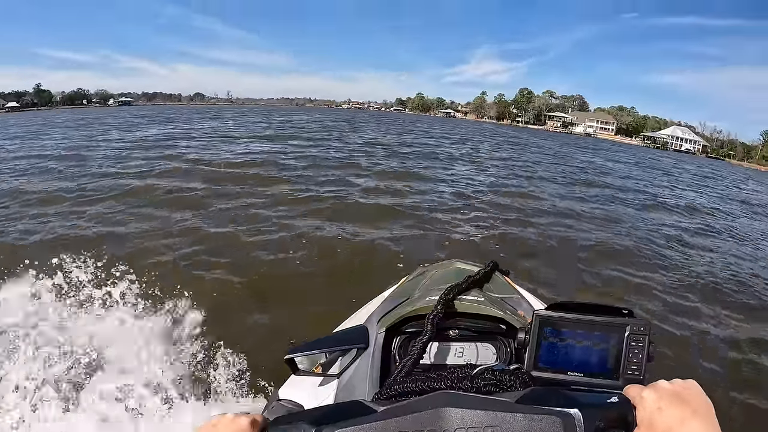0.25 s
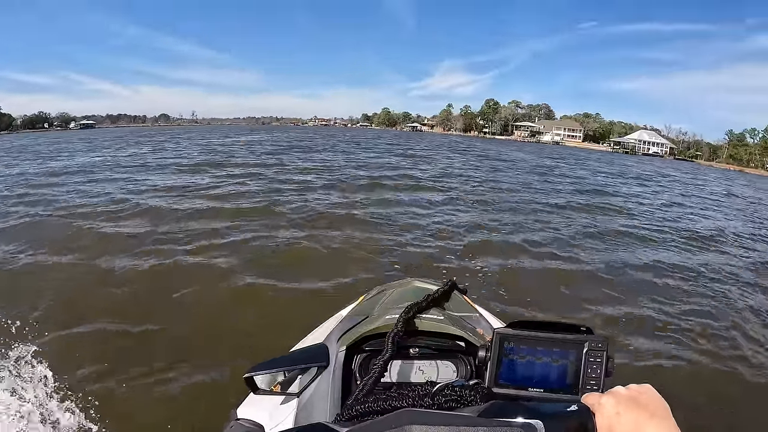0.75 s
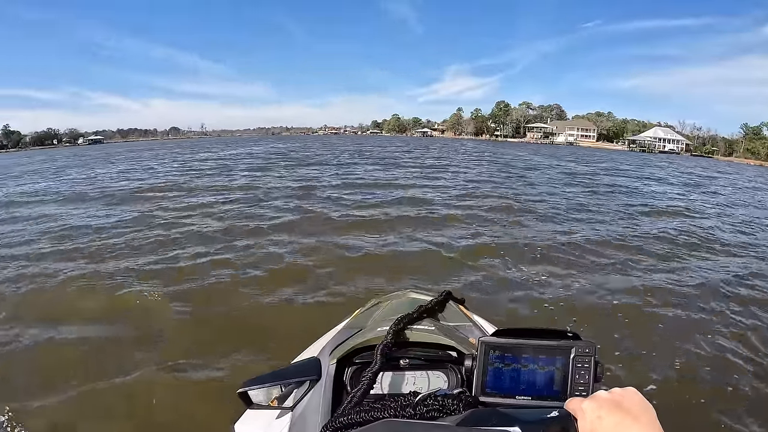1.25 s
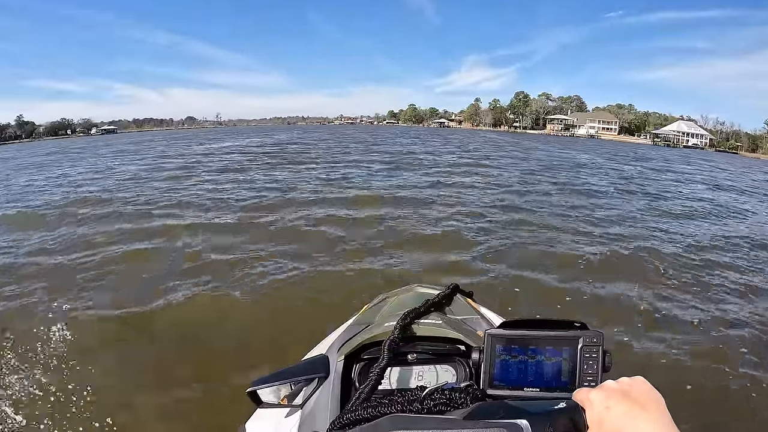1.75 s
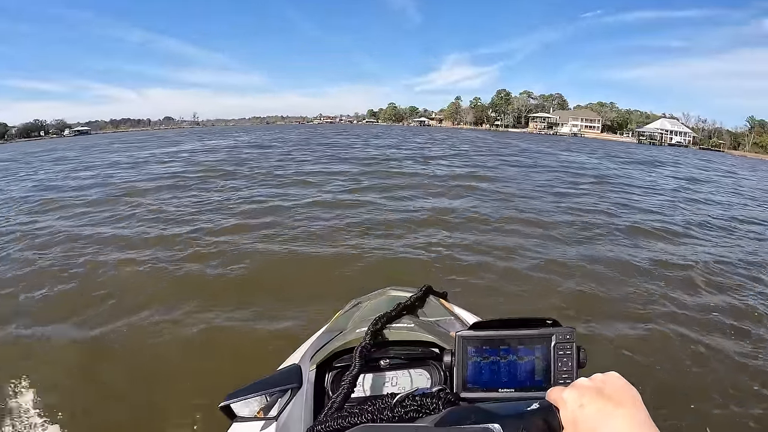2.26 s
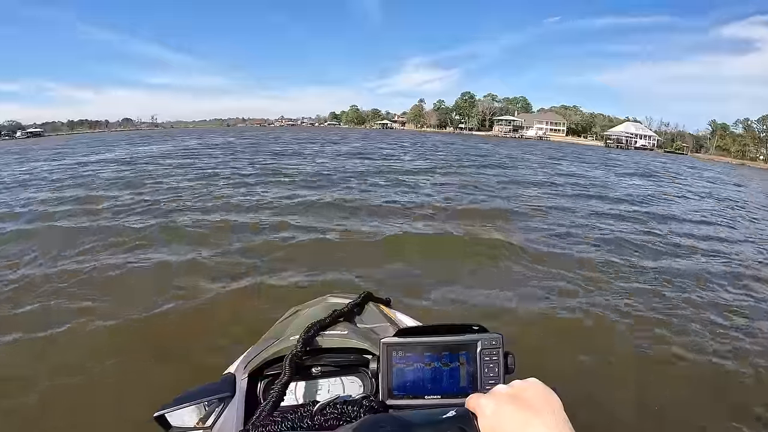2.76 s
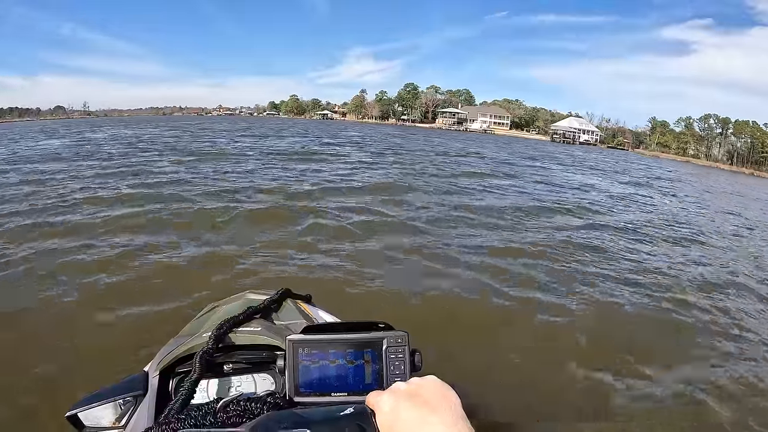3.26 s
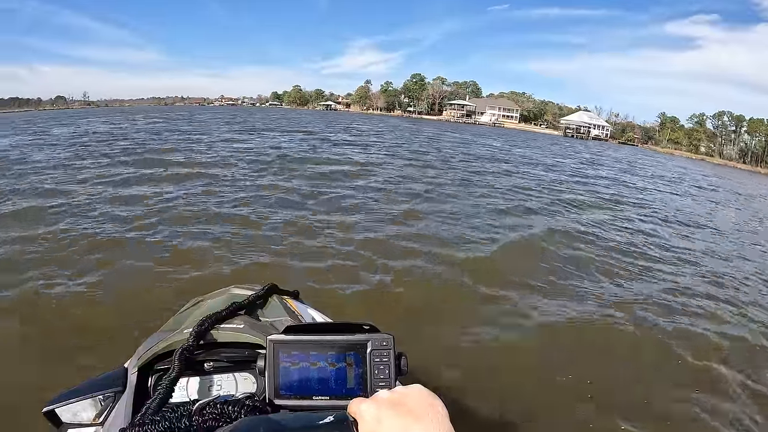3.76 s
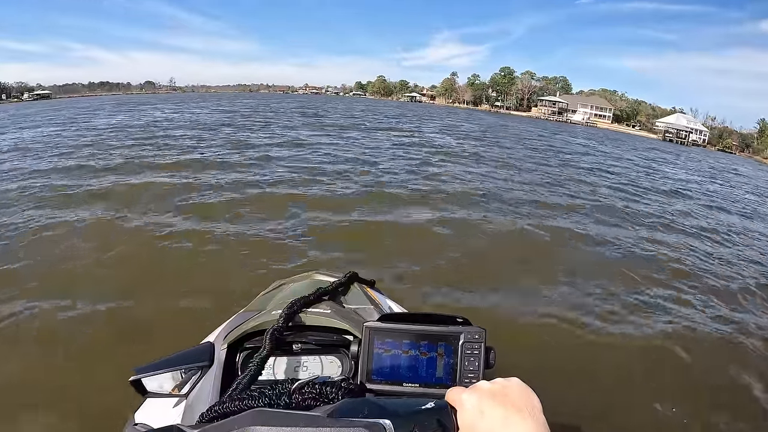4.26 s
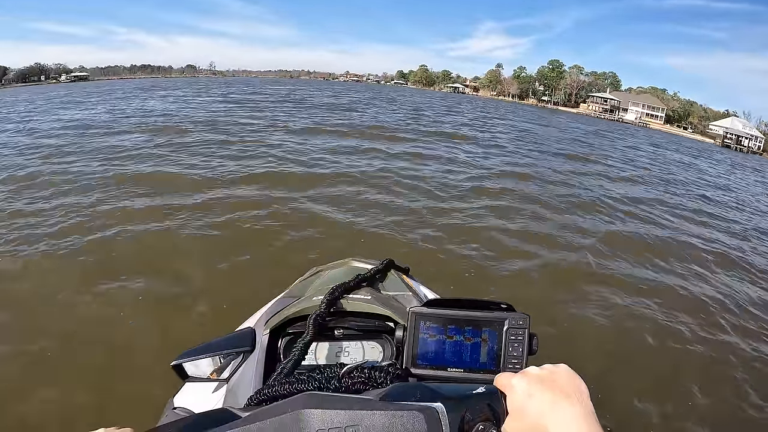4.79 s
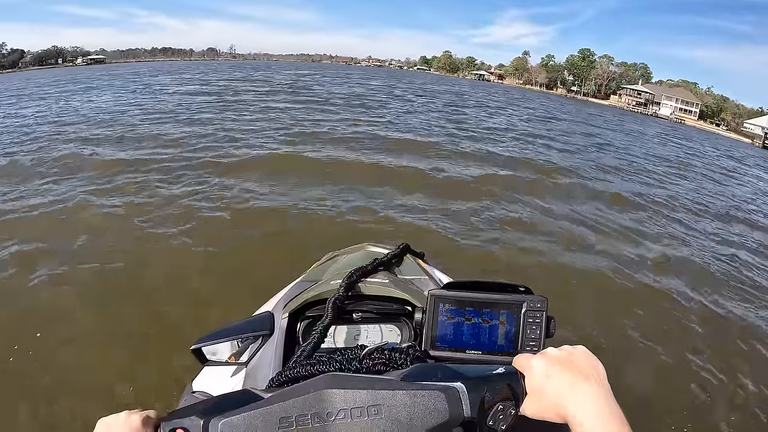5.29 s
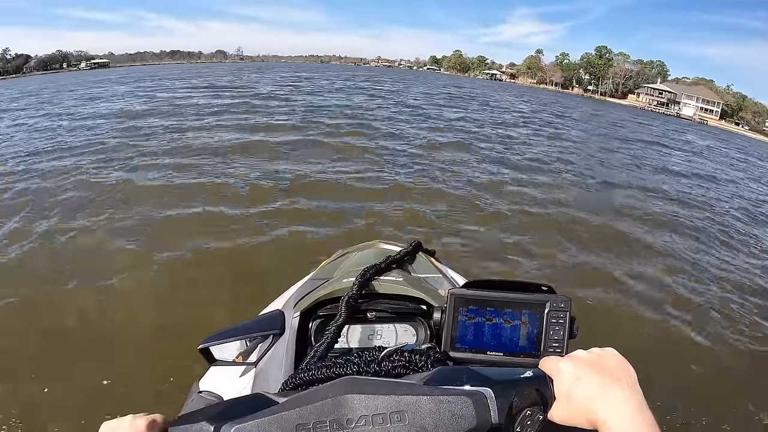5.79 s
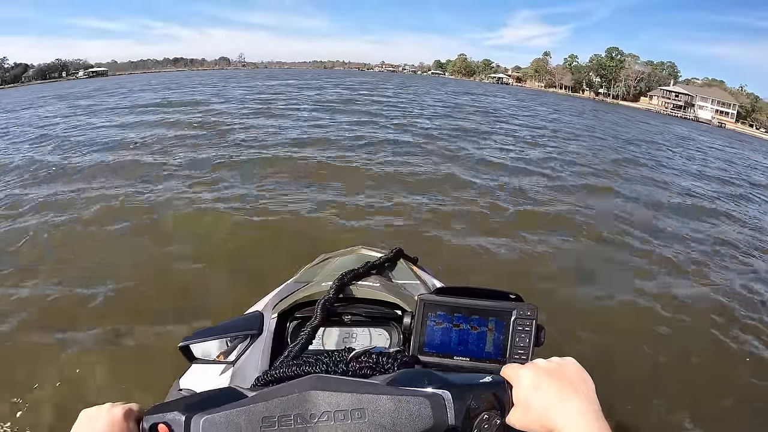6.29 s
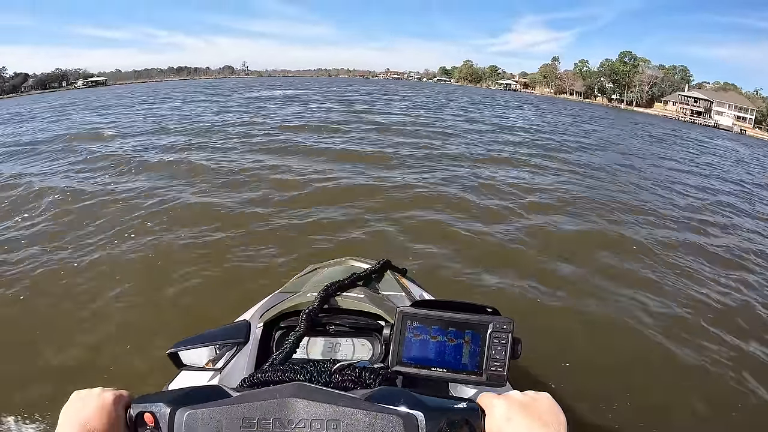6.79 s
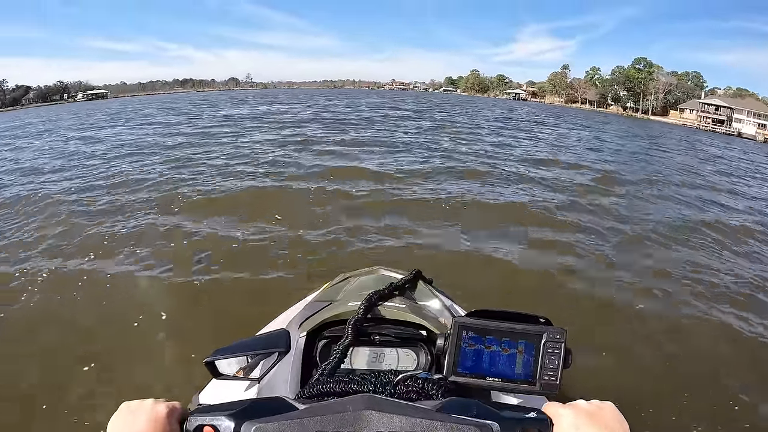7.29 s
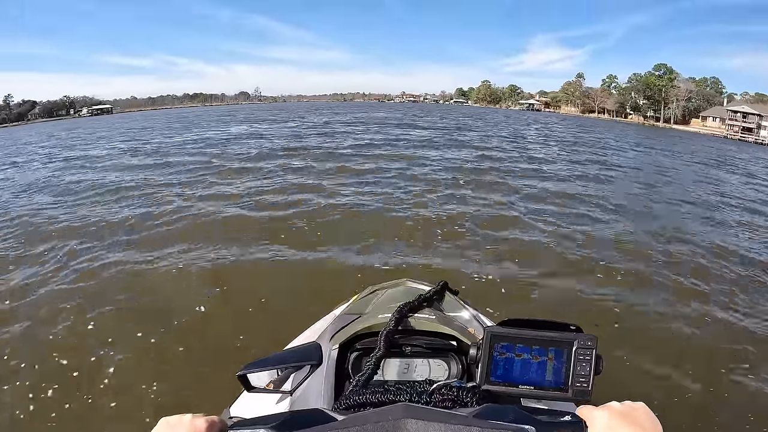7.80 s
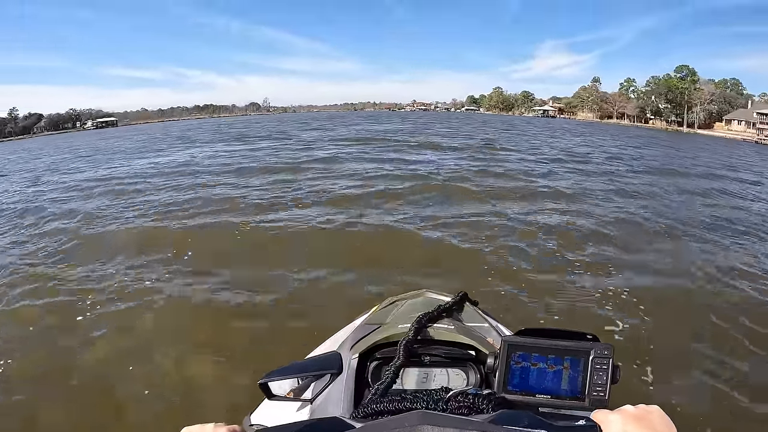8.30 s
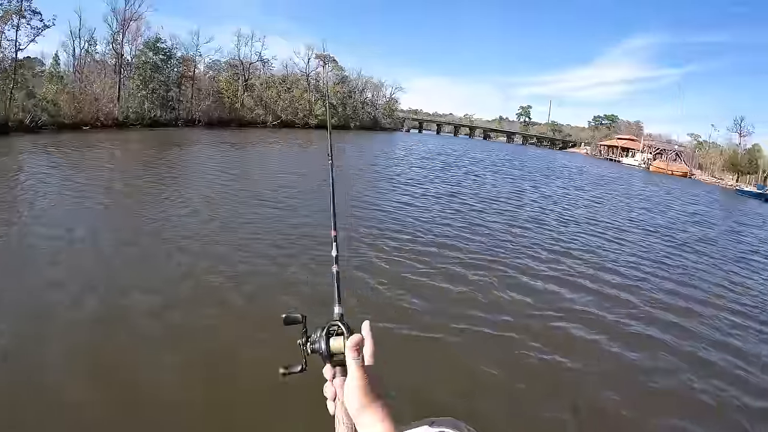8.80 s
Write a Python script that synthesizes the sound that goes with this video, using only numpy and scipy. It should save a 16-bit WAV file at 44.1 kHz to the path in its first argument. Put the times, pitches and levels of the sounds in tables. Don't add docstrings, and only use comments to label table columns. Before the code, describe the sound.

From 0 to about 8.45 seconds, a personal watercraft runs over open water, heard close from the rider's chest. A deep, buzzing engine hum with a throbbing hull drone swells quickly at the start, then holds almost steady, creeping up only slightly in pitch. Low wind flutters and thumps unevenly on the microphone. Wake and spray rush by continuously, brightest in the first two seconds; the finest hiss disappears by about 2.5, and the water grows thinner and duller toward 5, with small surges from chop. At about 8.45 everything cuts instantly to a much quieter bay: light breeze, soft low thumps, faint lapping and a few tiny clicks. Around 8.74 the reel snaps, then a quick rising swish peaks near 8.83 amid a cluster of sharp clicks and a wind puff. Line hisses faintly afterward with a few last ticks.

```python
import sys
import numpy as np
from scipy import signal
from scipy.fft import rfft, irfft, next_fast_len
from scipy.io import wavfile
from scipy.ndimage import uniform_filter1d

SR = 44100
rng = np.random.default_rng(int(sys.argv[2]) if len(sys.argv) > 2 else 0)


def voltage_ratio(level):
    return 10 ** (np.asarray(level, float) / 20)


def to_wav(s):
    ch = np.atleast_2d(s).T
    pcm = np.round(np.clip(ch, -1, 1) * 32767)
    wavfile.write(sys.argv[1], SR, pcm.astype(np.int16))


N = 399100
TIME = np.arange(N) / SR
LONG = next_fast_len(N)
HOP = 32
CUT_S = 372770 / SR
TRIM_HZ = 51.8, 53.0, 54.1


def curves(table):
    s, *columns = np.transpose(table)
    return [np.interp(TIME, s, column) for column in columns]


def fine(x):
    return np.interp(TIME, TIME[::HOP], x)


def walk(rate):
    hold = int(SR / HOP / rate)
    steps = np.repeat(rng.standard_normal(int(N / SR * rate) + 40), hold)
    smooth = uniform_filter1d(uniform_filter1d(steps, hold), hold)
    return 1.15 * smooth[:len(TIME[::HOP])]


def trim(rows):
    cycle_hz = curves(ENGINE)[0]
    return np.array([np.interp(cycle_hz, TRIM_HZ, db) for db in rows])


def swells(rows, centres_hz, octaves):
    s, db, hz, length = np.transpose(rows)
    distance = np.log2(np.array(centres_hz)[:, None] / hz) / octaves
    reach = np.exp(-distance ** 2)
    coarse = np.arange(0, N / SR, .002)
    bells = np.exp(-.5 * ((coarse - s[:, None]) / length[:, None]) ** 2)
    change = reach @ (db[:, None] * bells)
    return np.array([np.interp(TIME, coarse, c) for c in change])


def middles(edges):
    return np.sqrt(np.prod(edges, axis=1))


def band_rms(x, lo, hi):
    hz = np.fft.rfftfreq(LONG, 1 / SR)
    inside = (hz > lo) & (hz < hi)
    return np.sqrt(2 * np.sum(np.abs(rfft(x, LONG))[inside] ** 2) / LONG / N)


def rush(colour, edges, levels_db, rate, shared_db, own_db, grit=0.):
    hz = np.fft.rfftfreq(LONG, 1 / SR) + 1e-9
    f, db = np.transpose(colour)
    hits = rng.random(N) < 2500 / SR
    drops = hits * rng.standard_normal(N) * voltage_ratio(1.7 * rng.exponential(size=N))
    source = rng.standard_normal(N) + grit * drops / drops.std()
    shaped = rfft(source, LONG) * voltage_ratio(np.interp(np.log(hz), np.log(f), db, -200, -200))
    whole = irfft(shaped, LONG)[:N]
    gains_db = [level[::HOP] - 20 * np.log10(band_rms(whole, *e)) for level, e in zip(levels_db, edges)]
    anchors = np.log(middles(edges))
    shared = shared_db * walk(rate)
    octave = np.log2(hz)
    out = 0
    for centre in f[0] * 2 ** np.arange(0, np.log2(f[-1] / f[0]) + .5, .5):
        window = np.clip(1 - 2 * np.abs(octave - np.log2(centre)), 0, 1)
        band = irfft(shaped * window, LONG)[:N]
        gain_db = sum(g * np.interp(np.log(centre), anchors, share)
                      for g, share in zip(gains_db, np.eye(len(edges))))
        out = out + band * fine(voltage_ratio(gain_db + shared + own_db * walk(rate)))
    return out


# start_s, cycle_hz, firing_db
ENGINE = [(0, 51.08, -30), (.2, 51.5, -18), (.6, 51.77, -20.5), (.9, 51.84, -14), (1.2, 51.76, -18.5),
          (1.4, 51.92, -15), (1.8, 52.28, -18.5), (2.3, 52.75, -20), (2.65, 52.67, -24), (3.4, 53.02, -19),
          (4.0, 52.85, -18), (4.8, 53.19, -20.5), (5.2, 53.38, -21), (5.6, 53.18, -21), (6.0, 53.32, -27),
          (6.45, 53.35, -20), (6.85, 53.93, -18), (8.44, 54.19, -18.5)]
# bow_up_db, planing_db, cruising_db
STRONG_TONES = [
    (-25.5, -19.5, -21.5),
    (-23.5, -21.5, -21.5),
    (-27, -30.5, -31),
]
# multiple of the engine cycle (no unit), bow_up_db, planing_db, cruising_db
WEAK_TONES = [(1, -42, -46, -47), (3.996, -27, -26.5, -27.5), (5, -34.5, -34, -47), (7, -31.5, -43, -47.5),
              (9, -31.5, -32.5, -42), (10, -52, -52, -42), (11, -43.5, -44, -47), (12, -35.5, -54, -57),
              (14, -50, -63.5, -51.5), (15, -45, -45.5, -45.5), (16, -34, -50, -42.5),
              (17, -49, -56, -52.5), (18, -56.5, -55, -56), (19, -55.5, -62, -61.5), (20, -60, -51.5, -43),
              (21, -51.5, -53.5, -56), (22, -54.5, -53.5, -60)]
# start_s, change_db, pitch_hz, length_s
CHOP = [(0, -6, 105, .15), (.55, 4, 105, 0.28), (1.0, -1.5, 420, 0.13), (1.45, 3, 315, .12),
        (1.7, 2.5, 420, 0.081), (2.3, 5, 105, .4), (3.3, 1, 315, 0.1), (3.5, -2, 105, .2),
        (3.95, 3, 360, 0.18), (4.8, -2.5, 425, 0.11), (5.6, -2.5, 320, 0.089), (5.95, 5.5, 106, .35),
        (6.2, -2.5, 320, 0.072), (6.4, 1, 320, 0.072), (5.95, 4, 160, .12), (6.37, -9, 160, .03),
        (7.3, 1, 325, .2), (8.45, 3, 300, .012), (7.38, -11, 160, .03), (8.13, -5, 160, .05),
        (7.7, -2.5, 325, 0.23), (8.36, -3, 325, .05)]
FIRING, IMPELLER, DRONE, CRANK = 3, 6, 8, 2


def engine():
    hz, firing_db = curves(ENGINE)
    strong = np.array([FIRING, IMPELLER, DRONE, CRANK])
    strong_db = np.vstack([firing_db, trim(STRONG_TONES)]) + swells(CHOP, TRIM_HZ[1] * strong, octaves=.25)
    turn = 2 * np.pi * np.cumsum(hz) / SR
    turn = turn - np.interp(CUT_S + .00058, TIME, turn)
    out = 0
    for k, db in zip(strong, strong_db):
        lag = 1.2 * (k == CRANK)
        level = fine(voltage_ratio(db[::HOP] + .5 * walk(12)))
        out = out + level * np.cos(k * turn - lag + fine(.13 * walk(9)))
    for k, *db in WEAK_TONES:
        delay = 2 * np.pi * rng.random() * (k > FIRING + 1)
        level = fine(voltage_ratio(np.interp(hz[::HOP], TRIM_HZ, db) + 1.5 * walk(4)))
        out = out + level * np.cos(round(k) * turn + delay + fine(.046 * k * walk(6)))
    return -np.sqrt(2) * out


# pitch_hz, level_db (per Hz)
WIND_COLOUR = [(10, -5), (30, 2.5), (100, 1), (175, 6), (260, 1.5), (370, -4.5), (450, -5), (510, -12),
               (560, -17.5), (650, -44.5)]
# low_hz, high_hz
WIND_BANDS = (20, 70), (70, 140), (140, 300), (300, 540)
# bow_up_db, planing_db, cruising_db
AIRFLOW = [
    (-34, -30, -34),
    (-27, -34, -31),
    (-25.5, -25.5, -30),
    (-30, -29, -26.5),
]
# start_s, change_db, pitch_hz, length_s
GUSTS = [(.05, 6.5, 80, 0.13), (.56, 11, 131, 0.055), (.7, -9, 300, .06), (.98, 6.5, 220, 0.06),
         (1.4, 5, 280, 0.078), (1.68, 6, 205, 0.064), (.95, -6, 45, .1), (2.1, 1.5, 100, .06),
         (2.5, 2.5, 250, .1), (2.8, 3, 100, .06), (3.15, 5, 250, 0.07), (3.28, -9, 50, .08),
         (3.64, 3, 37, .06), (3.92, 0, 205, 0.091), (4.2, -8, 205, 0.1), (4.48, 1, 37.2, .07),
         (4.76, 6, 400, 0.052), (5.1, 10, 205, 0.064), (5.32, -5, 149, 0.047), (5.46, 12, 90, 0.05),
         (5.88, 10, 37, .06), (5.88, -8, 205, 0.097), (6.3, 7, 205, 0.054), (6.72, 9, 37, 0.075),
         (6.86, -9, 205, 0.13), (7.4, 4.5, 450, 0.052), (7.42, 16, 70.6, .06), (8.15, 8, 100, 0.14),
         (8.1, 4, 450, .08), (8.44, 14, 205, 0.044)]


def wind():
    levels_db = trim(AIRFLOW) + swells(GUSTS, middles(WIND_BANDS), octaves=0.53)
    return rush(WIND_COLOUR, WIND_BANDS, levels_db, rate=20, shared_db=-0.94, own_db=2.24) * voltage_ratio(1.18)


# pitch_hz, level_db (per Hz)
WATER_COLOUR = [(250, -21.5), (450, 10.5), (800, 10), (1100, 6), (1500, 1), (2200, -3.5), (3200, -5),
                (5000, -11.5), (7500, -19.5), (9000, -26.5), (11000, -34.5), (13000, -43.5), (14200, -52),
                (15500, -61)]
# low_hz, high_hz
WATER_BANDS = (560, 1050), (1200, 2500), (3000, 6000), (7000, 10000)
# start_s, wake_db, spray_db
WASH = [(0, -34, -42), (.3, -35.5, -41), (.7, -35.5, -41.5), (1.1, -36.5, -41.5), (1.5, -36.5, -43),
        (1.78, -36, -42), (2.1, -39, -43), (2.6, -41.5, -43), (3.3, -41.5, -45), (3.6, -39.5, -46),
        (4.1, -38.5, -46.5), (4.3, -40, -48), (5.1, -43, -50), (5.65, -41, -49.5), (6.25, -39.5, -48.5),
        (6.6, -41.5, -51), (7.6, -41, -51.5), (8.42, -41, -52.5)]
# bow_up_db, planing_db, cruising_db
SLOSH_MIST = [
    (-35.5, -37, -35),
    (-12, -11.5, -10),
]
# start_s, change_db, pitch_hz, length_s
SPLASHES = [(1.02, 2, 770, .07), (1.19, -1.5, 770, .06), (1.36, 2.5, 900, 0.092), (1.7, 1, 8400, .08),
            (2.04, 0, 770, 0.062), (2.36, 4, 2000, .05), (.5, 0.5, 2000, .2), (3.95, 1, 1400, .05),
            (6.36, -1.5, 1400, .05), (2.95, 1, 8400, 0.048), (3.18, -2.5, 8400, 0.087),
            (3.4, -3, 8400, .07), (3.55, 2, 7000, .05), (3.9, 2, 770, .1), (4.08, 2, 8400, 0.055),
            (4.25, -4.5, 6000, 0.1), (4.75, 1, 5500, .1), (5.65, 2, 8400, 0.11), (4.42, -3.5, 770, .07),
            (5.1, 3.5, 770, 0.078), (5.95, 1, 5030, .07), (6.25, 3, 8400, .05), (7.3, 0, 770, .07),
            (7.85, 1.5, 900, .1), (7.9, 2, 4200, 0.057), (8.04, -3, 4200, .05), (8.2, 3, 2000, .06)]


def water():
    wake_db, spray_db = curves(WASH)
    churn_db = wake_db + 41
    calm_db, under_db = trim(SLOSH_MIST)
    slosh_db = calm_db + 1.22 * churn_db
    mist_db = spray_db + under_db + .2 * churn_db
    levels_db = [slosh_db, wake_db, spray_db, mist_db] + swells(SPLASHES, middles(WATER_BANDS), octaves=0.81)
    return rush(WATER_COLOUR, WATER_BANDS, levels_db, rate=32, shared_db=0.79, own_db=0.7, grit=0.4)


# pitch_hz, level_db (per Hz)
FIZZ_COLOUR = [(5590, -29), (9500, -7), (11000, -7.5), (13100, 0.5), (14000, -4.5), (15100, -7),
               (15800, -4), (16200, -12)]
BOW_DROP_S = 1.5


def fizz():
    settled = np.clip(TIME - BOW_DROP_S, 0, 1)
    level_db = -57 - 1 * TIME - 65 * settled
    return rush(FIZZ_COLOUR, [(12000, 15500)], [level_db], rate=10, shared_db=.9, own_db=2.0)


# pitch_hz, level_db (per Hz)
BREEZE_COLOUR = [(8, -8), (20, 2.5), (60, -10.5), (120, -13), (220, -18.5), (350, -31.5), (500, -41)]
# low_hz, high_hz
BAY_BANDS = (10, 90), (90, 400)
# start_s, change_db, pitch_hz, length_s
PUFFS = [
    (8.46, -9, 190, 0.036),
    (8.54, 8, 30, 0.027),
    (8.67, 9, 60, 0.024),
    (8.72, 9, 80, 0.042),
    (8.835, 17, 70, 0.029),
    (8.888, 16, 30, .014),
    (8.95, 5, 150, .04),
    (9.05, -3, 30, .03),
]
BAY_DB = -37.5, -39


def bay():
    levels_db = np.array(BAY_DB)[:, None] + swells(PUFFS, middles(BAY_BANDS), octaves=1.4)
    return rush(BREEZE_COLOUR, BAY_BANDS, levels_db, rate=33, shared_db=1.6, own_db=1.7)


# pitch_hz, level_db (per Hz)
ROD_COLOUR = [(300, 0), (500, -1.5), (1300, -4.5), (2600, -8), (3700, -11.5), (4500, -17), (5400, -19),
              (7500, -14), (9500, -21), (13000, -25), (15000, -42)]
# low_hz, high_hz
CAST_BANDS = (900, 1800), (1800, 3800), (3800, 6500), (6500, 9000)
# start_s, change_db, pitch_hz, length_s
RUSTLES = [
    (8.46, -7, 2980, .02),
    (8.54, 5, 5000, .015),
    (8.7, 6, 7600, .02),
    (8.742, 19, 2600, 0.014),
    (8.745, 8, 6500, 0.015),
    (8.8, 7.5, 1270, 0.016),
    (8.876, 5, 2600, 0.0097),
]
# start_s, peak_db, pitch_hz, fade_s (time to
# fall 60 dB)
CLICKS = [(8.501, -43, 1050, .03), (8.524, -47, 1300, .03), (8.6, -52, 2400, .015),
          (8.672, -52, 4500, .004), (8.737, -37, 2100, .02), (8.742, -37, 2500, .025),
          (8.752, -43, 1900, .015), (8.79, -42, 1250, .025), (8.805, -40, 1700, .02),
          (8.815, -36, 2350, .025), (8.822, -35, 2450, .02), (8.826, -31, 2930, .02),
          (8.834, -38, 7660, 0.013), (8.838, -35, 7100, .012), (8.838, -41, 4400, .01),
          (8.836, -30, 1650, .02), (8.842, -35, 1450, .02), (8.872, -40, 2280, .015),
          (8.882, -33, 2200, .015), (8.91, -39, 1510, .05), (8.955, -42, 2100, .03)]
LAPPING_DB = -60.5, -64, -71.5, -73.5
SWING_DB = 14.4, 26.4, 22.5, 19
LINE_DB = 11.5, 14.4, 12, 7.2
SWING_S, SWING_RISE_S, SWING_FALL_S = 8.832, 0.041, 0.026


def cast():
    late = TIME - SWING_S
    width_s = np.where(late < 0, SWING_RISE_S, SWING_FALL_S)
    speed = np.exp(-.5 * (late / width_s) ** 2)
    line_db = np.array(LINE_DB)[:, None] - 10 * late
    line_db = line_db * (late > 0) * (1 - speed)
    levels_db = np.array(LAPPING_DB)[:, None] + np.outer(SWING_DB, speed) + line_db
    levels_db = levels_db + swells(RUSTLES, middles(CAST_BANDS), octaves=0.71)
    out = rush(ROD_COLOUR, CAST_BANDS, levels_db, rate=79, shared_db=-0.2, own_db=2.5, grit=.6)
    for s, db, hz, fade_s in CLICKS:
        age = TIME[TIME > s] - s
        out[N - len(age):] += voltage_ratio(db - 60 * age / fade_s) * np.sin(2 * np.pi * hz * age)
    return out


def scene():
    ride = engine() + wind() + water() + fizz()
    return np.where(TIME < CUT_S, ride, bay() + cast())[None]


def top_cut(x):
    return signal.sosfilt(signal.butter(12, 16370, fs=SR, output="sos"), x)


def record(dry):
    soft = np.tanh(1.284 * dry) / 1.23
    low_pass = signal.ellip(8, .1, 60, 15750, fs=SR, output="sos")
    mix = signal.sosfiltfilt(low_pass, soft)
    return top_cut(mix)


dry = scene()
out = record(dry)
to_wav(out)
```